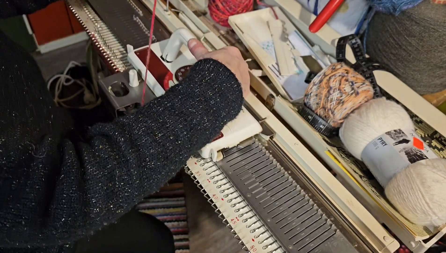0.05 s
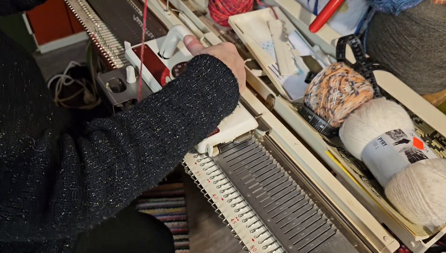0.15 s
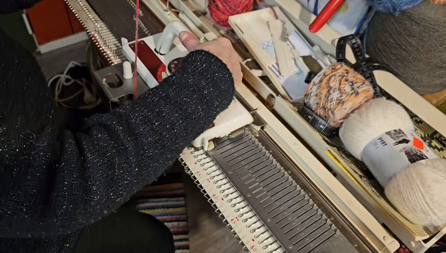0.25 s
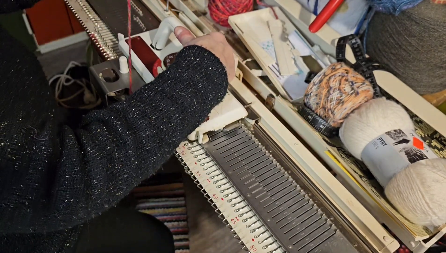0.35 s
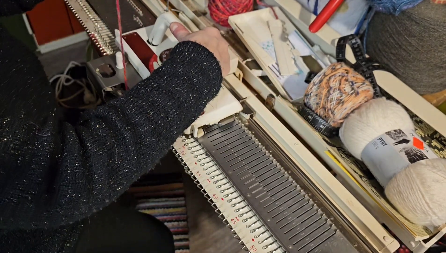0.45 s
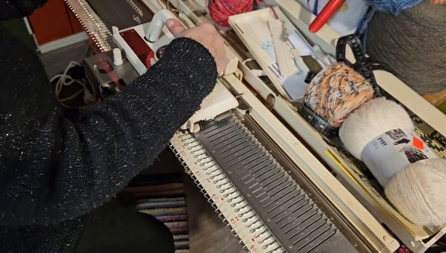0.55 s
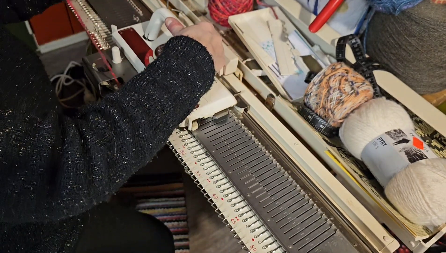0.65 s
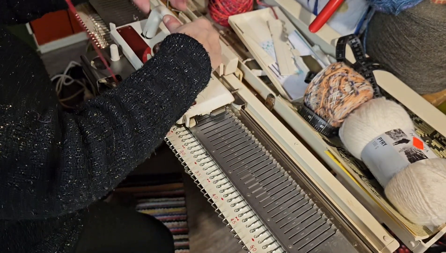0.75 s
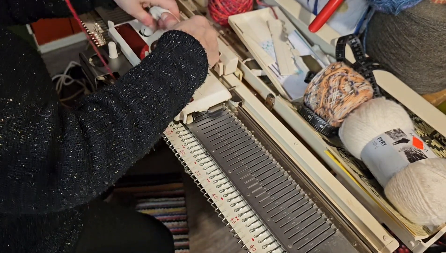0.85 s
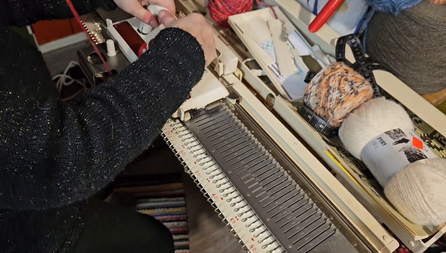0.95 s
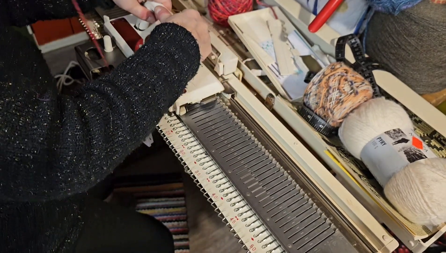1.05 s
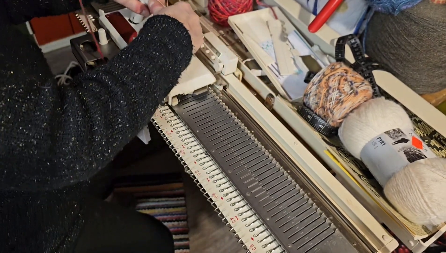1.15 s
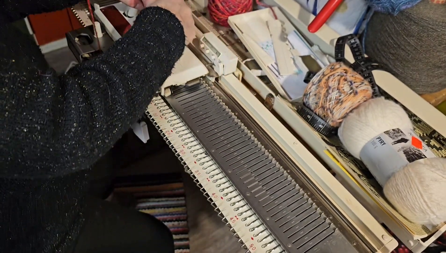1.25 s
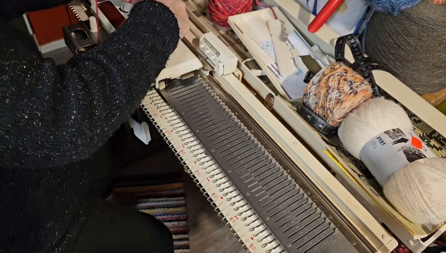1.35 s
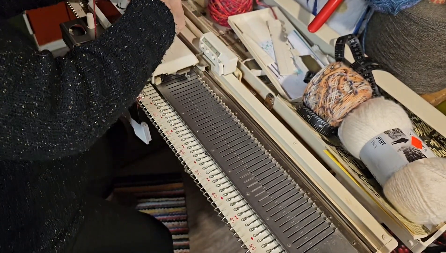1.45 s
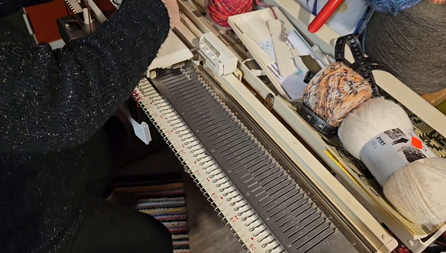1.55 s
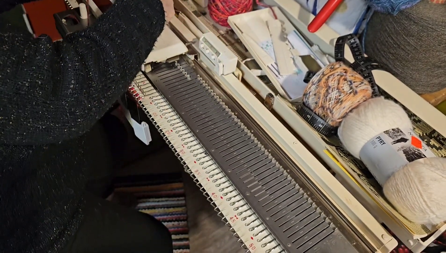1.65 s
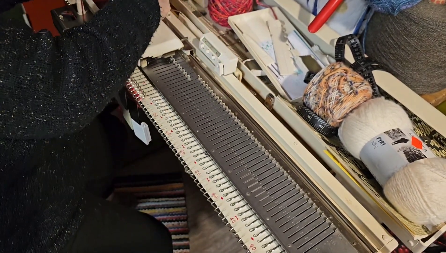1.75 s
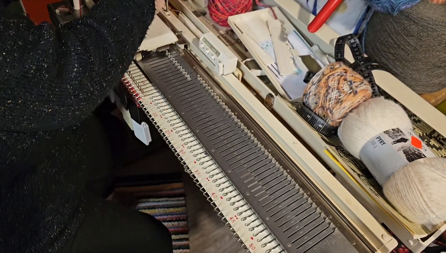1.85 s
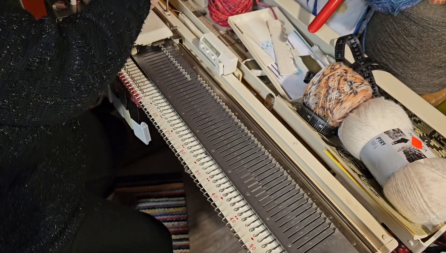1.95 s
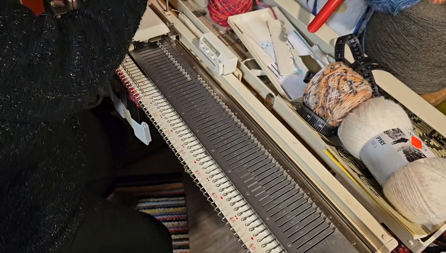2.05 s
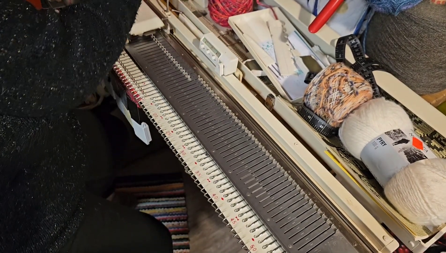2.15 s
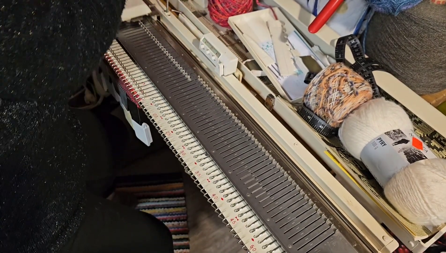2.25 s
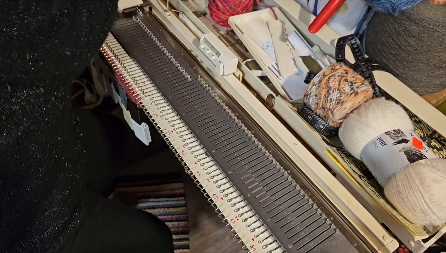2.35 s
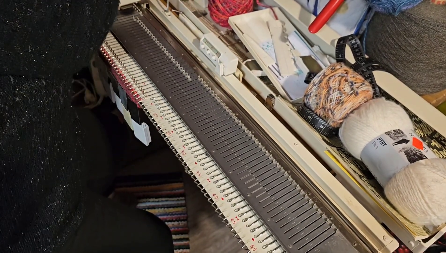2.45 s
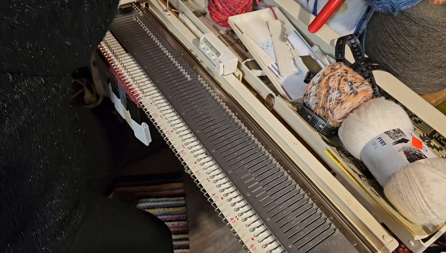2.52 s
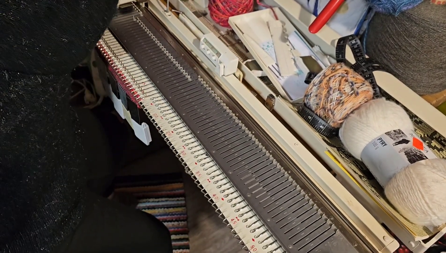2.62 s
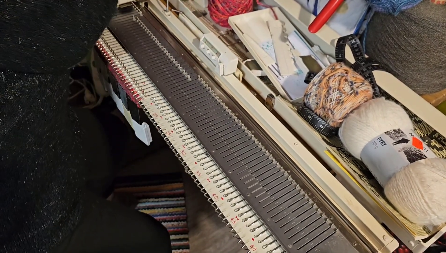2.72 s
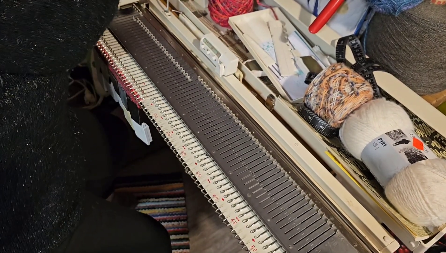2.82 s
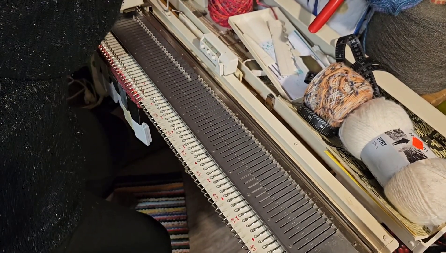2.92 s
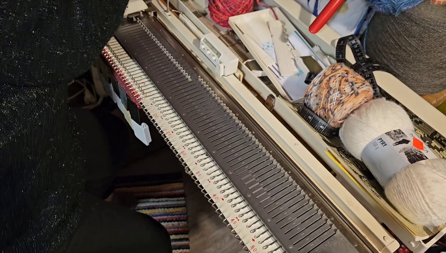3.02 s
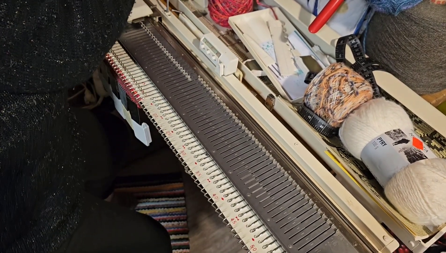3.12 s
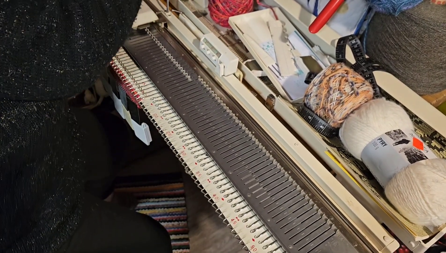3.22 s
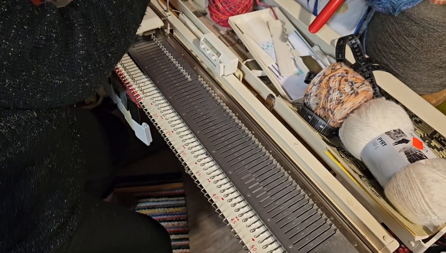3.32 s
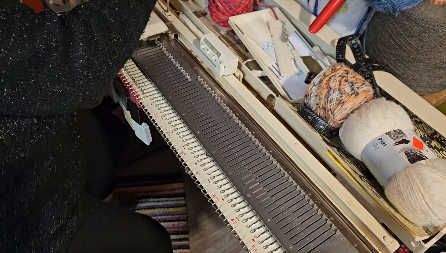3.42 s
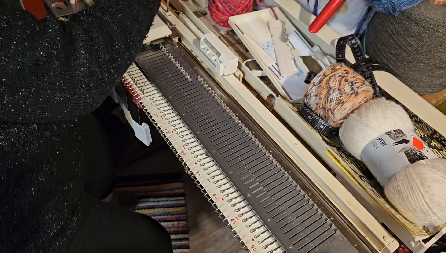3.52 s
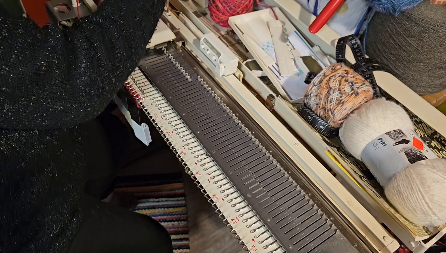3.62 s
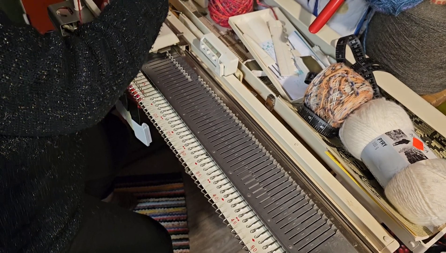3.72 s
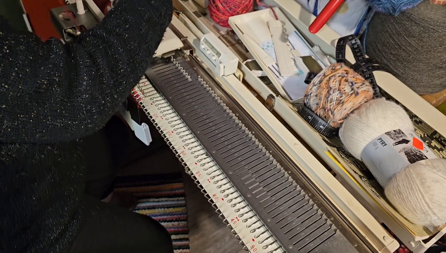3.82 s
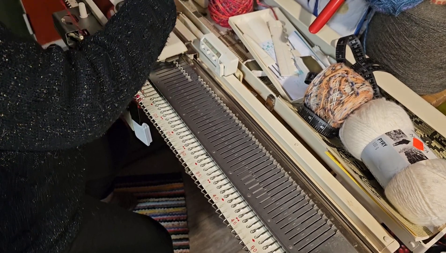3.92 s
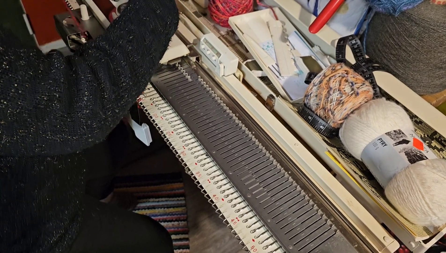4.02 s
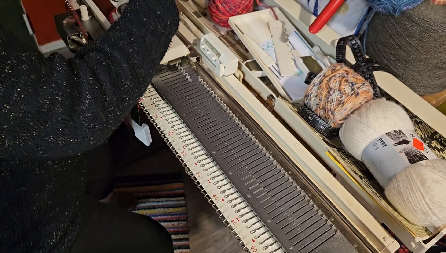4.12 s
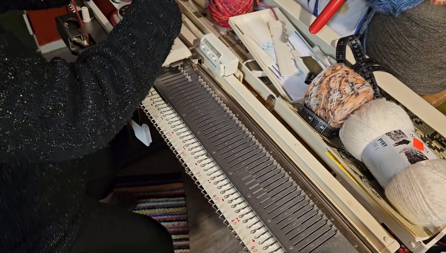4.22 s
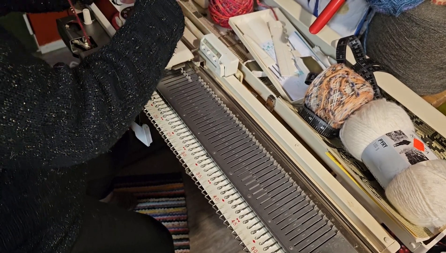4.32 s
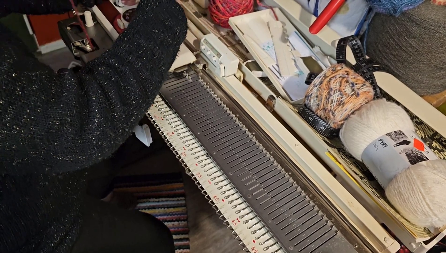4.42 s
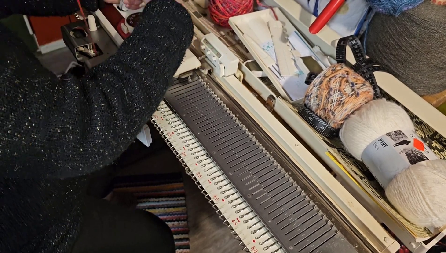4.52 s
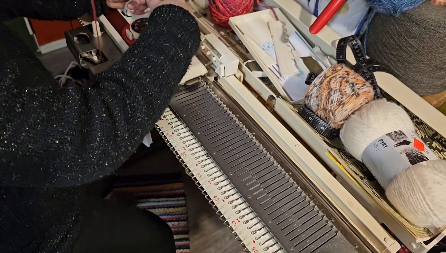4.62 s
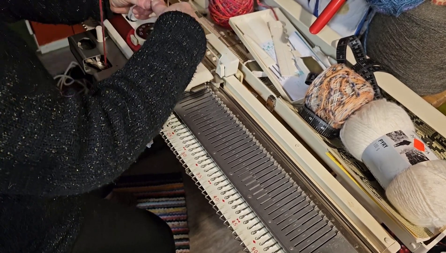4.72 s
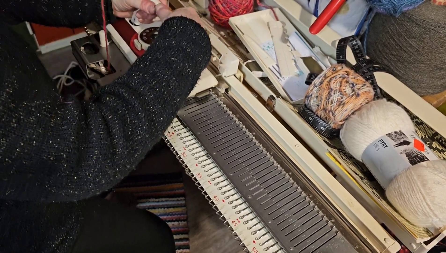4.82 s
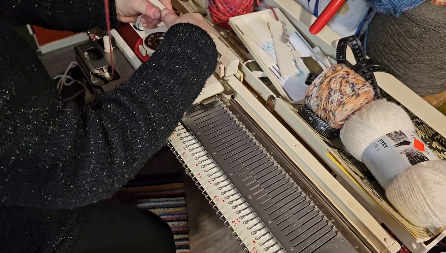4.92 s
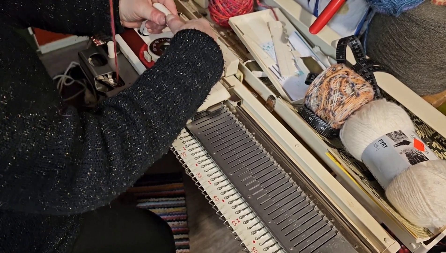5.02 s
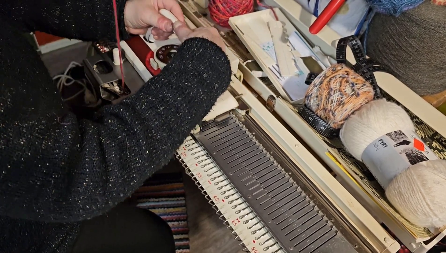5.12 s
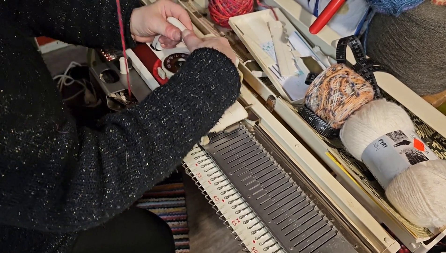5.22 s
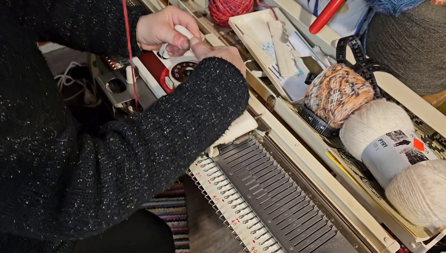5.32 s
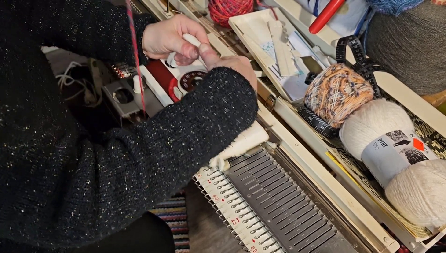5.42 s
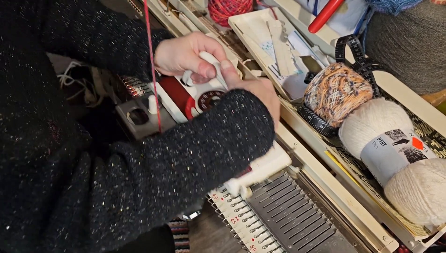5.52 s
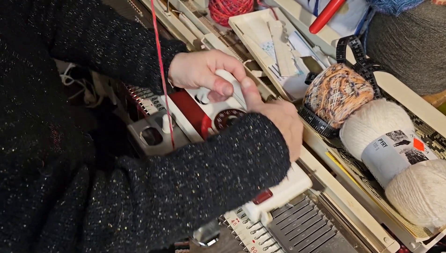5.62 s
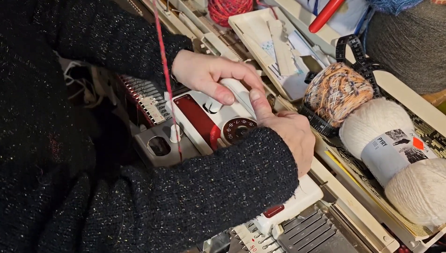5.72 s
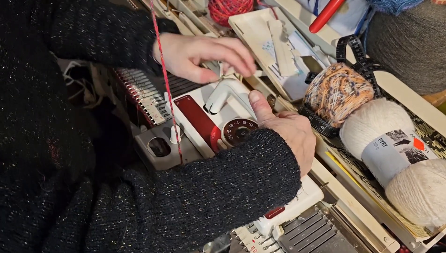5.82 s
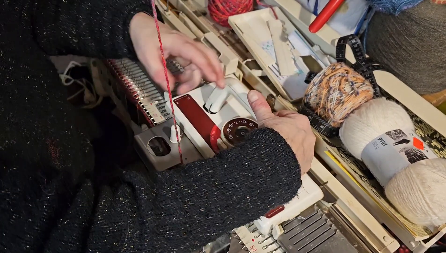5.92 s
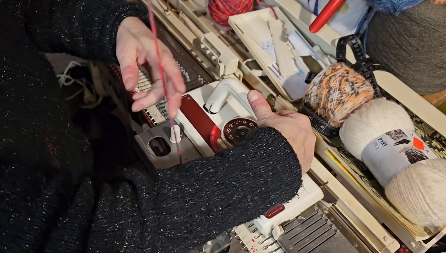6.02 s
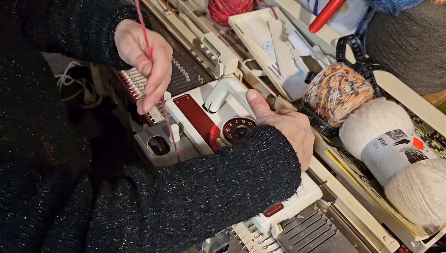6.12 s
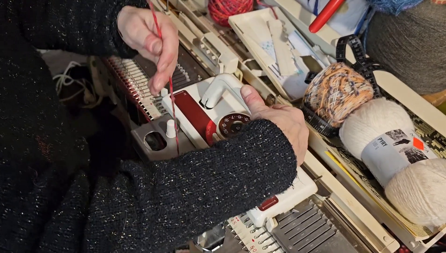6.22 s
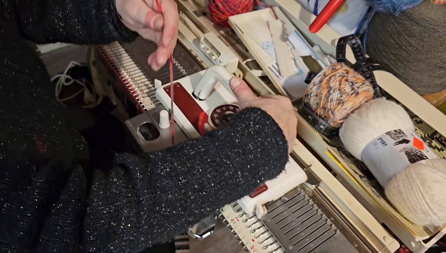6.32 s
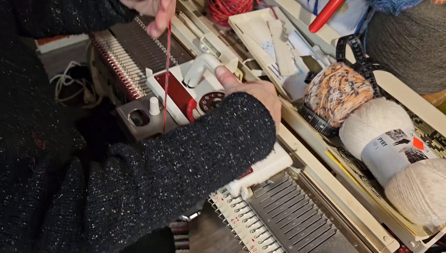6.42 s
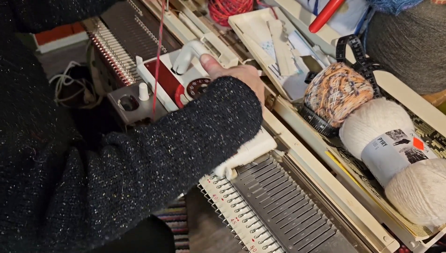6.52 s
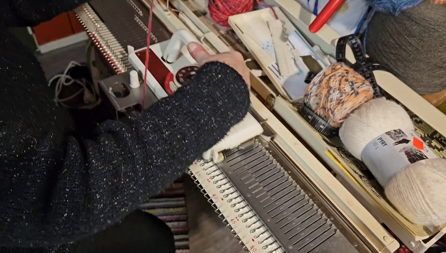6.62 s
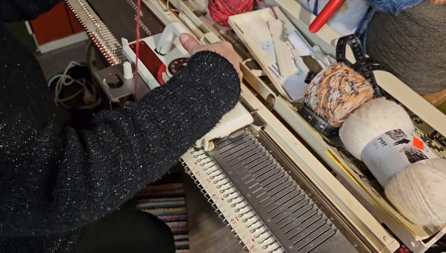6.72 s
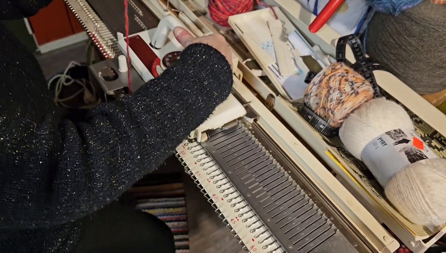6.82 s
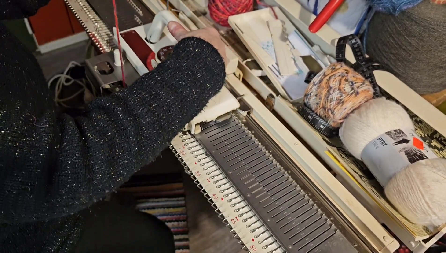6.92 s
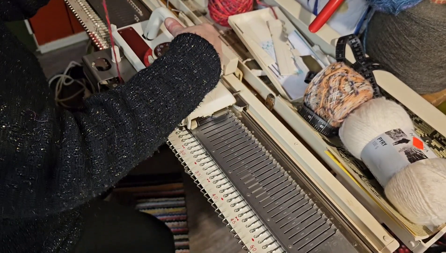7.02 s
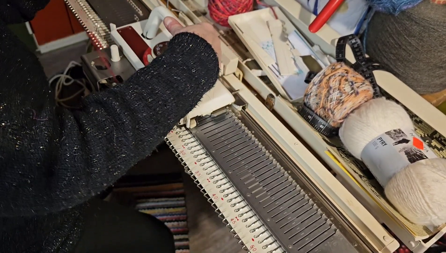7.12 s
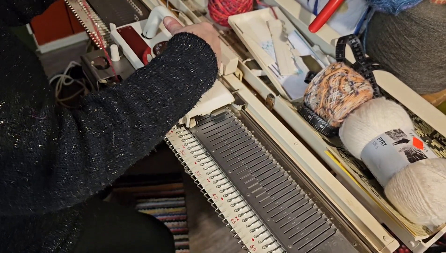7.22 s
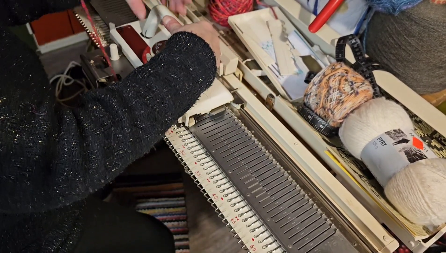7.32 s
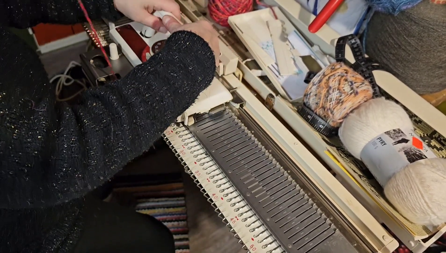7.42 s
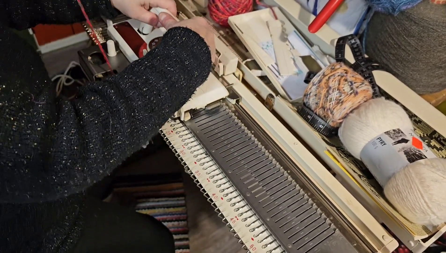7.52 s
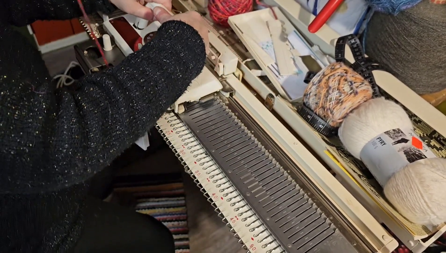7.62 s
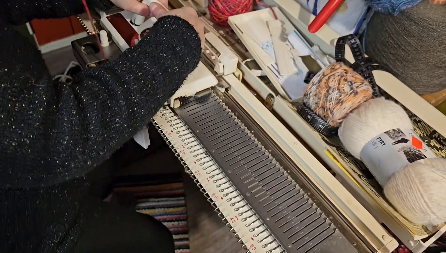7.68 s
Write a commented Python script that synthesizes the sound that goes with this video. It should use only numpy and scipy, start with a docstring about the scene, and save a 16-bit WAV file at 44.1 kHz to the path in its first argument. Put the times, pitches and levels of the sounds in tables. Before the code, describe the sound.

A knitting machine carriage is pushed back and forth along its metal needle bed, rasping and clicking, with heavy jolts and a brief squeal at the turn.

```python
"""A knitting machine in a quiet room: a hand pushes its carriage to and fro along the steel needle bed.
From the start the carriage rasps on its rails and shakes the table, and its cams kick needles into clicks.
It jolts at once, then far more heavily on the way out; it sets off back with a dry rub and latch knocks.
The return pass brings another heavy jolt; near its end, the rail squeals and squeaks as the carriage slows.
A thin ringing scrape and a second squeal start the last pass. Two microphones hear it, alike in the bass."""
import sys
import numpy as np
from scipy import signal
from scipy.fft import rfft, irfft, next_fast_len
from scipy.io import wavfile

SR = 44100
rng = np.random.default_rng(int(sys.argv[2]) if len(sys.argv) > 2 else 0)


def store_wav(level_fs):
    """Save 16-bit WAV to argv[1]."""
    pcm = np.round(np.clip(np.atleast_2d(level_fs), -1, 1) * 32767)
    wavfile.write(sys.argv[1], SR, pcm.T.astype(np.int16))


N = 341775
TIME = np.arange(N) / SR
SIZE = next_fast_len(N + SR // 2)
HZ = np.maximum(np.arange(SIZE // 2 + 1) * SR / SIZE, 1)


def from_db(db):
    """Decibels to amplitude gain."""
    return 10 ** (np.asarray(db) / 20)


def rms_one(x):
    """Scale to unit power."""
    return x / np.sqrt(np.mean(x ** 2) + 1e-20)


def in_time(rows):
    """Each column of a curve, joined by straight lines, at every sample."""
    s, *columns = np.transpose(rows)
    return [np.interp(TIME, s, column) for column in columns]


def at_hz(points):
    """A table joined by lines on a log-frequency axis."""
    hz, value = np.transpose(points)
    return np.interp(np.log(HZ), np.log(hz), value)


def drift(rate_hz):
    """Smooth chance with spread 1, mostly slower than the given rate."""
    white = rfft(rng.standard_normal(SIZE))
    return rms_one(irfft(white / (1 + (HZ / rate_hz) ** 2), SIZE)[:N])


# likeness of the left and right microphones, 1 for identical: pitch_hz, likeness
MICROPHONE_LIKENESS = [(180, 0.99), (350, 0.93), (630, 0.78), (1200, 0.44), (2200, 0.3), (4000, 0),
                       (11000, -.05)]


def noise(gain):
    """Stereo noise of a given colour, alike in both ears in the bass; unit power in the middle."""
    alike = np.clip(at_hz(MICROPHONE_LIKENESS), -.99, .99)
    white = rng.standard_normal((2, 2 * len(HZ)), dtype=np.float32).view(np.complex64)
    mid_side_gain = (gain * np.sqrt([1 + alike, 1 - alike])).astype(np.float32)
    mid, side = irfft(white * mid_side_gain, SIZE)[:, :N]
    return np.array([mid + side, mid - side]) / np.std(mid)


def resonance(hz, width_hz):
    """Response of one damped mode, 1 on top."""
    return 1 / (1 + 1j * (HZ ** 2 - hz ** 2) / (HZ * width_hz))


def die_away(power, t60_s):
    """Power that decays by 60 dB in t60 after each impulse."""
    return signal.lfilter([1], [1, -10 ** (-6 / (t60_s * SR))], power + 1e-18)


def blows(times_s, level_db, decays, rise_s):
    """Envelope of impacts; each (dB, t60 s) stage dies at its own pace: contact, metalwork, room."""
    impulses = np.zeros(N)
    impulses[np.clip(np.round(times_s * SR).astype(int), 0, N - 1)] = from_db(level_db) ** 2
    power = sum(from_db(db) ** 2 * die_away(impulses, t60_s) for db, t60_s in decays)
    keep = np.exp(-1 / (rise_s * SR))
    return np.sqrt(signal.lfilter([1 - keep], [1, -keep], power))


def grains(per_s, spread_db, t60_s, smooth_db):
    """Envelope of many tiny catches on top of even friction; unit power."""
    sizes = from_db(spread_db * np.minimum(rng.exponential(1, N), 3))
    catches = rng.random(N) < per_s / SR
    power = die_away(catches * sizes ** 2, t60_s)
    return rms_one(np.sqrt(power / power.mean() + from_db(smooth_db) ** 2))


def rings(times_s, level_db, low_hz, high_hz, t60_s, count):
    """Each contact falls on a different spot, so it rings at a few pitches of its own."""
    out = np.zeros((2, N + SR // 10))
    t = np.arange(SR // 10) / SR
    fade = from_db(-60 * t / t60_s) * (1 - np.exp(-t / 0.00047))
    for s, db in zip(times_s, level_db):
        hz = low_hz * (high_hz / low_hz) ** rng.random((count, 1))
        # high modes reach the two ears out of step
        turns = hz * t + rng.random((2, count, 1)) * np.minimum(hz / 4000, 1)
        modes = rng.random((count, 1)) * np.sin((2 * np.pi * turns).astype(np.float32))
        start = int(s * SR)
        out[:, start:start + len(t)] += from_db(db) * fade * modes.sum(axis=1)
    return out[:, :N]


def struck(rows, modes, rise_s):
    """Blows (s, dB) on a body that rings with its own modes (Hz, dB, t60 s)."""
    out = np.zeros(N + SR // 2)
    t = np.arange(SR // 2) / SR
    for s, db in rows:
        ring = 0
        for hz, mode_db, t60_s in modes:
            ring = ring + from_db(mode_db - 60 * t / t60_s) * np.sin(2 * np.pi * (hz * t + rng.random()))
        start = int(s * SR)
        out[start:start + len(t)] += from_db(db) * (1 - np.exp(-t / rise_s)) * ring
    return out[:N]


GRIP_S = 0.03  # a push takes hold this quickly


def strokes(rows, fade_db_per_s):
    """Level in dB of strokes that take hold, swell or ease while they last, and then fade."""
    level = 1e-6
    for start, end, first_db, last_db in rows:
        grip = np.clip((TIME - start) / GRIP_S, 0, 1)
        held_db = np.interp(TIME, [start, end], [first_db, last_db])
        fading_db = fade_db_per_s * np.maximum(TIME - end, 0)
        level = np.maximum(level, grip * from_db(held_db - fading_db))
    return 20 * np.log10(level)


# still air of the room, its colour: pitch_hz, density_db (per Hz)
AIR_COLOUR = [(35, -28.5), (60, 0.5), (153, -3.5), (322, -14.5), (418, -5.5), (978, -13.5), (1880, -8),
              (5240, -12), (12000, -28)]
AIR_DB = -72


def room_air():
    """The still air of the room is a faint, steady noise."""
    return from_db(AIR_DB) * noise(from_db(at_hz(AIR_COLOUR)))


# the hand pushes the carriage: start_s, end_s, friction_start_db, friction_end_db,
# shell_weight_db (added to the friction), table_shaking_db
HAND_PUSHES = [(-0.05, 0.055, -32, -40.5, -13, -61), (0.041, 0.302, -35.5, -47, 2.5, -45),
               (0.327, 0.743, -40, -43, 0, -47.5), (0.805, 0.98, -47.5, -42, 1.5, -51.5),
               (1.033, 1.165, -49, -39, 5, -50.5), (1.138, 1.45, -34, -30, -2, -46),
               (1.45, 2.106, -40, -36.5, 1.5, -46), (2.148, 2.33, -40.5, -37, -4, -50.5),
               (2.384, 2.51, -50.5, -49, -2.5, -47.5), (2.507, 2.664, -54, -59.5, -3.5, -60),
               (2.652, 2.895, -61.5, -77.5, 6, -70.5), (3.005, 3.367, -66.5, -55.5, -13, -72),
               (3.371, 4.126, -49.5, -45, 0, -64), (4.286, 4.586, -50.5, -46.5, 5, -51),
               (4.578, 5.48, -35.5, -34.5, 2, -45), (5.479, 5.79, -34.5, -47.5, 0.5, -46.5),
               (6.336, 6.557, -64.5, -50.5, -3.5, -65.5), (6.54, 6.663, -62, -41.5, -8, -50.5),
               (6.665, 6.88, -33.5, -35.5, -2.5, -48.5), (6.89, 7.17, -38.5, -43, 2.5, -56),
               (7.348, 7.464, -71, -52.5, 3.5, -59.5), (7.574, 7.767, -41.5, -33.5, -2, -50.5)]
COAST_DB_PER_S, SETTLE_DB_PER_S = 160, 106  # after a push: friction dies away, the table more slowly


def pushing():
    """Levels in dB of the friction on the rails and of the hand's weight on the shell."""
    friction_db = strokes([push[:4] for push in HAND_PUSHES], COAST_DB_PER_S)
    weighted = [(start, end, first + weight, last + weight)
                for start, end, first, last, weight, _ in HAND_PUSHES]
    return friction_db, strokes(weighted, COAST_DB_PER_S)


# colour of the carriage's rasp on the rails: pitch_hz, density_db (per Hz)
RASP_COLOUR = [(25, -7.5), (100, -13), (210, -7), (300, -2.5), (400, 6.5), (700, -2.5), (930, -4.5),
               (1300, 3), (2000, 3.5), (2700, -18.5), (5000, -28.5)]
# colour of the finer hiss of rails and latches: pitch_hz, density_db (per Hz)
HISS_COLOUR = [(1200, -17), (2500, -3), (4500, -2), (5700, -3), (10000, -8.5), (12000, -27.5)]


def sliding(friction_db, pressing_db):
    """The carriage scrapes its rails and latches flick; the hand's weight brings out rasp and shell hum."""
    latches = grains(per_s=130, spread_db=3.6, t60_s=0.013, smooth_db=0.5)
    latches = latches ** np.interp(friction_db, [-60, -50], [.3, 1])  # a light touch hardly flicks them
    scrape = grains(per_s=90, spread_db=3.0, t60_s=0.1, smooth_db=-4.0)
    rasp_db = (friction_db + pressing_db) / 2 - 5.5
    rasp = from_db(rasp_db) * scrape * noise(from_db(at_hz(RASP_COLOUR)))
    hiss_db = friction_db - 6.0 + 0.026 * (friction_db + 50)
    hiss = from_db(hiss_db) * latches * noise(from_db(at_hz(HISS_COLOUR)))
    shell_db = pressing_db - 15.5 + 2.0 * drift(11)
    shell = from_db(shell_db) * noise(np.abs(resonance(760, 390)) ** 2)
    return rasp + hiss + shell


# the shell's drone shifts with its load and place: time_s, pitch_hz
SHELL_DRONE = [(1.45, 669.6), (2.0, 677.3), (3.95, 681.3), (4.5, 704), (5.5, 695), (7.0, 681)]


def drone(pressing_db, wander_hz=22, upper_ratio=1.11, upper_db=-5):
    """Two neighbouring resonances of the shell wander in pitch and speak only under a firm push."""
    hz, = in_time(SHELL_DRONE)
    turn = 2 * np.pi * np.cumsum(hz) / SR
    lower = drift(wander_hz) * np.cos(turn) + drift(wander_hz) * np.sin(turn)
    upper_turn = upper_ratio * turn
    upper = drift(wander_hz) * np.cos(upper_turn) + drift(wander_hz) * np.sin(upper_turn)
    level_db = pressing_db - 12.5 + 0.26 * (pressing_db + 34.0)
    return from_db(level_db) * (lower + from_db(upper_db) * upper)


# resonances of bed and carriage: pitch_hz, width_hz, boost_db
BED_RESONANCES = [(429.4, 15, 6), (676, 50, 9), (853.5, 21, 8.5), (1065, 85, 5.5), (2350, 12, 4.5),
                  (3650, 71, 3.5), (6310, 69, 5), (7365, 38, 7)]


def bed(x):
    """What touches the bed rings with its modes."""
    response = 1
    for hz, width_hz, boost_db in BED_RESONANCES:
        response = response * (1 + (from_db(boost_db) - 1) * resonance(hz, width_hz))
    return from_db(-1.5) * irfft(rfft(x, SIZE) * response, SIZE)[:, :N]


def shaking(s, knock_db):
    """Level in dB of the table's shaking: each push keeps it going and each knock jolts it."""
    held = [(start, end, db, db) for start, end, *_, db in HAND_PUSHES]
    pushed = from_db(strokes(held, SETTLE_DB_PER_S))
    jolted = blows(s, knock_db, [(-11.5, 0.51)], rise_s=0.011)
    return 20 * np.log10(np.hypot(pushed, jolted))


# resonances of the table: pitch_hz, width_hz, level_db
TABLE_RESONANCES = [(111.4, 13, -3), (137.9, 3.7, 7), (189, 25, -6.5)]
# the table top thumps: time_s, level_db
TOP_THUMPS = [(0.11, -33), (0.355, -33), (1.44, -30), (2.025, -32), (2.127, -30), (5.31, -28.5),
              (5.52, -27), (7.7, -33)]
# the frame under it thuds, mostly towards the far end of the bed: time_s, level_db
FRAME_THUDS = [(1.345, -49.5), (1.457, -47.5), (1.957, -40), (2.04, -41), (2.25, -39), (7.1, -51)]


def table(rumble_db, friction_db):
    """The carriage shakes the table in lumps at its low modes; now and then the top thumps or frame thuds."""
    mode_power = sum(np.abs(from_db(db) * resonance(hz, width)) ** 2 for hz, width, db in TABLE_RESONANCES)
    lumps = grains(per_s=90, spread_db=1.5, t60_s=0.2, smooth_db=-6)
    rumble_colour = np.sqrt(mode_power) / (1 + (HZ / 280) ** 4) / (1 + (70 / HZ) ** 2)
    rumble = from_db(rumble_db - 2.0) * noise(rumble_colour)
    frame_db = rumble_db - 20.0 + 0.41 * (friction_db + 42.5) + 2.0 * drift(7.5)
    frame = from_db(frame_db) * noise(np.abs(resonance(61, 38)) / (1 + (HZ / 150) ** 4))
    thumps = struck(TOP_THUMPS, [(133.9, 0.0071, 0.23)], rise_s=0.012)
    thuds = struck(FRAME_THUDS, [(60.0, 0.0038, 0.52)], rise_s=0.0054)
    return lumps * (rumble + frame) + thumps + thuds


# the cams kick needles into clicks, at slow and fast travel alike: time_s, tick_db, brightness_db
TIMED_KICKS = [(0.0562, -30, 7), (0.1694, -41, 16.5), (0.3295, -41, 3), (0.4448, -41.5, 13),
               (0.4883, -35, 4), (0.5503, -30.5, 2.0), (0.6154, -25.5, 2), (0.7021, -27.5, 2.5),
               (0.843, -29, 1.5), (0.9623, -35, -1.5), (1.0806, -28.5, 1.5), (1.1608, -28.5, -1.5),
               (1.3521, -26, 2), (1.4701, -31, -3), (1.5437, -31.0, 0.0), (1.6013, -28.5, 1),
               (1.6567, -27.0, 0.5), (1.6975, -25.5, -1), (1.7371, -28.0, 0), (1.7906, -29.5, -0.0),
               (2.0283, -22.5, 3.5), (2.0712, -29, 1.5), (2.1235, -30.5, 1), (2.1986, -28.5, -1.0),
               (2.2493, -32.5, 1), (2.36, -22.5, 5), (2.3828, -24, 7), (2.4693, -42.5, 1),
               (2.853, -66.5, -6), (3.0667, -61.5, -7), (3.2349, -27, 5), (3.388, -39, 11),
               (3.3955, -34.5, 3), (3.5987, -44.5, 0), (4.1583, -41.5, -3.5), (4.2797, -56, -6),
               (4.3666, -32.5, -0.5), (4.4871, -31, -1.5), (4.5935, -26.5, 1), (4.6414, -23.0, 2.5),
               (4.8659, -30, -1.0), (4.933, -28, 0), (4.9797, -30, -2), (5.2504, -23, -2.5),
               (5.4534, -27.5, -7), (5.4856, -28.5, -5.5), (5.525, -44, 1), (5.6299, -22.5, -4),
               (5.6624, -34, 9), (5.86, -52.5, -3), (5.9519, -60.5, 4), (6.03, -56, -2),
               (6.3091, -60.5, -3.5), (6.5703, -36, -1), (6.9369, -33.5, 1), (6.9837, -29, 1.5),
               (7.0297, -25, -1.5), (7.0895, -28.5, 3.0), (7.1698, -31, 2.5), (7.4166, -49, -4),
               (7.588, -37.5, -4.5), (7.6488, -28.5, -4), (7.704, -28.5, -1.5)]
# runs of needles kicked at an even pace: first_s, last_s, needles (count), tick_db
EVEN_RUNS = [(1.209, 1.316, 4, -26), (1.855, 1.985, 4, -27.5), (3.410, 3.486, 5, -43),
             (3.514, 3.539, 2, -45), (3.66, 3.74, 5, -46), (3.821, 4.057, 5, -37.5), (4.686, 4.813, 4, -29),
             (5.1285, 5.207, 3, -27.5), (5.284, 5.4173, 5, -28), (6.678, 6.763, 4, -39.5)]
UNEVEN_DB, COLOUR_SPREAD_DB = 1.3, 2  # spread from needle to needle in a run: strength, brightness
FIRM_TICK_DB, FIRM_KNOCK_DB = -27, -38  # a firm kick, and its knock in the bed
KNOCK_FOLLOWS = 0.77  # the knock follows this share of the tick's swing in dB


def kicks():
    """Time, tick, brightness and knock of every needle kicked, individually timed or in even runs."""
    rows = list(TIMED_KICKS)
    for first, last, needles, db in EVEN_RUNS:
        for s in np.linspace(first, last, round(needles)):
            tick_db = db + UNEVEN_DB * rng.standard_normal()
            rows.append((s, tick_db, COLOUR_SPREAD_DB * rng.standard_normal()))
    s, tick_db, bright_db = np.transpose(rows)
    knock_db = FIRM_KNOCK_DB + KNOCK_FOLLOWS * (tick_db - FIRM_TICK_DB)
    return s, tick_db, bright_db, knock_db


# colour of steel snapping on steel: pitch_hz, density_db (per Hz)
SNAP_COLOUR = [(1000, -18), (2400, -2), (4500, 8), (6200, 1), (10000, 1.5), (12000, -15)]
# colour of the knock through the bed: pitch_hz, density_db (per Hz)
KNOCK_COLOUR = [(300, -28.5), (600, -15.5), (900, -8.5), (1400, -1.5), (2100, 2), (3000, -11.5),
                (6000, -27)]
SNAP_RISE_S = 0.0005  # the contact builds up this quickly


def needle_kicks(s, tick_db, bright_db, knock_db):
    """Steel snaps on steel with a weaker tail; a slower knock runs through bed and shell, and parts ring."""
    upper = 1 / (1 + (6000 / HZ) ** 8)
    snap_then_tail = [(2.5, 0.015), (-5.0, 0.09), (-8.0, 0.21)]
    snap = 0
    # a brighter kick has more of the upper band and less of the lower
    for tilt_db, share in ((bright_db / 2 - 2.5, upper), (0.8 - bright_db / 2, 1 - upper)):
        envelope = blows(s, tick_db + tilt_db, snap_then_tail, SNAP_RISE_S)
        snap = snap + envelope * noise(from_db(at_hz(SNAP_COLOUR)) * np.sqrt(share)) / np.sqrt(2)
    knock = blows(s, knock_db - bright_db / 2, [(-4.0, 0.13), (-2.5, 0.17)], rise_s=0.0011)
    knock = knock * noise(from_db(at_hz(KNOCK_COLOUR)))
    shell = blows(s, tick_db - bright_db / 2, [(-18.5, 0.22)], rise_s=0.0011)
    shell = shell * noise(np.abs(resonance(620, 420)) ** 2)
    needles = rings(s, tick_db + 1, low_hz=3000, high_hz=8500, t60_s=0.025, count=4)
    plates = rings(s, knock_db - 1.0, low_hz=952.0, high_hz=2575, t60_s=0.17, count=4)
    return snap + knock + shell + needles + plates


# the carriage jolting over a catch: time_s, tick_db, knock_db
CATCH_JOLTS = [(0.057, -45, -37), (1.398, -19, -26.5), (5.0335, -20.5, -24)]
# what the jolt rings in the carriage body: pitch_hz, level_db, t60_s
CARRIAGE_MODES = [(600, 0, 0.074), (690, -1, 0.1), (826, 3.5, 0.11), (1216, 1.5, 0.065), (1514, 1.5, 0.045),
                  (2910, -3.5, 0.064)]
REBOUND_S, REBOUND_DB = 0.006, -2  # the jolt strikes twice in quick succession


def clunks():
    """A heavy jolt and its rebound knock the whole carriage body, with a thin steel chink on top."""
    s, tick_db, knock_db = np.transpose(CATCH_JOLTS)
    chink = blows(s, tick_db, [(3.5, .022), (-2.5, 0.2)], rise_s=0.0011)
    twice_s = np.r_[s, s + REBOUND_S]
    twice_db = np.r_[knock_db, knock_db + REBOUND_DB]
    knock = blows(twice_s, twice_db, [(2.5, 0.065), (-2.0, 0.2)], rise_s=0.00085)
    # colours: pitch_hz, density_db (per Hz)
    bright = [(1200, -15.0), (3500, -9.5), (6800, -11.0), (8300, -6.5), (10000, -8.5), (12000, -22)]
    heavy = [(300, -17.5), (550, -3.5), (1050, -6.0), (1400, 4.5), (2600, -1), (3600, -12.0), (5000, -21)]
    body = struck(zip(s, knock_db), CARRIAGE_MODES, rise_s=.0008)
    return body + bed(chink * noise(from_db(at_hz(bright))) + knock * noise(from_db(at_hz(heavy))))


# the hollow shell of the carriage rocks and bumps: time_s, level_db
SHELL_BUMPS = [(0.366, -43.5), (0.647, -42), (2.775, -65), (2.885, -68), (3.045, -69), (4.917, -41.5),
               (5.301, -42.5)]


def bumps():
    """The hollow shell of the carriage booms softly when it rocks."""
    s, level_db = np.transpose(SHELL_BUMPS)
    envelope = blows(s, level_db, [(4.0, 0.16), (-14.0, 0.21)], rise_s=0.0022)
    return envelope * noise(np.abs(resonance(570, 420)) / (1 + (HZ / 3000) ** 2))


def rub(rows, modes, edge_hz=2600):
    """A gritty rub in a few narrow bands that wander in pitch, with almost nothing above the edge."""
    power = sum(np.abs(from_db(db) * resonance(hz, width_hz)) ** 2 for hz, width_hz, db in modes)
    grit = grains(per_s=90, spread_db=3, t60_s=0.045, smooth_db=-3)
    steady = noise(np.sqrt(power) / (1 + (HZ / edge_hz) ** 16))
    position = np.cumsum(1 + 0.045 * drift(9))  # uneven reading speed bends the pitch
    bands = np.array([np.interp(position, np.arange(N), ear) for ear in steady])
    return from_db(strokes(rows, COAST_DB_PER_S)) * grit * bands


# a dry rub as the carriage sets off from the far end: start_s, end_s, start_level_db, end_level_db
FAR_END_RUB = [(3.39, 4.13, -49, -56)]
# its resonances: pitch_hz, width_hz, level_db
FAR_END_MODES = [(670, 56, -1.5), (800, 51, 3), (1160, 84, -2), (1280, 68, 1), (1720, 100, -1)]


def far_rub():
    """Dry friction at the far end excites a few resonances."""
    return rub(FAR_END_RUB, FAR_END_MODES)


# the carriage shell meets a latch: time_s, level_db
LATCH_BLOWS = [(3.821, -33), (3.882, -36), (3.939, -36), (6.57, -32)]
# what the latch rings with: pitch_hz, level_db, t60_s
LATCH_RINGING = [(1916, 1.5, 0.035), (2170, -2, 0.048)]


def latch_knocks():
    """The shell meets a latch with a woody knock: two short-lived modes."""
    return struck(LATCH_BLOWS, LATCH_RINGING, rise_s=0.0019)


# thin, hoarse rail squeals on either side of the turn: start_s, end_s, pitch_hz, level_db
RAIL_SQUEALS = [(5.565, 5.623, 5540, -48.5), (6.615, 6.675, 5810, -56)]
SQUEAL_WIDTH_HZ = 420  # width of the resonance, whose response is squared


def squeals():
    """Dry steel on the rail chatters in one narrow, high band."""
    out = 0
    for start, end, hz, db in RAIL_SQUEALS:
        envelope = from_db(strokes([(start, end, db, db)], COAST_DB_PER_S))
        out = out + envelope * noise(np.abs(resonance(hz, SQUEAL_WIDTH_HZ)) ** 2)
    return out


# the carriage squeaking on its rail: time_s, pitch_hz, level_db
RAIL_SQUEAK = [(5.695, 2413, -52), (5.715, 2414, -36.5), (5.735, 2400, -55), (5.785, 2430, -45.5),
               (5.83, 2340, -86)]


def squeak(waver=0.0036):
    """Stick and slip on the rail makes a thin, unsteady tone that flutters in strength."""
    hz, level_db = in_time(RAIL_SQUEAK)
    sounding = (TIME > RAIL_SQUEAK[0][0]) & (TIME < RAIL_SQUEAK[-1][0])
    turn = 2 * np.pi * np.cumsum(hz * (1 + waver * drift(87))) / SR
    return sounding * from_db(level_db + 2 * drift(40)) * np.sin(turn)


# a scrape as the carriage sets off from the near end: start_s, end_s, start_level_db, end_level_db
NEAR_END_RUB = [(6.405, 6.66, -59.5, -54.5)]
# its resonances: pitch_hz, width_hz, level_db
NEAR_END_MODES = [(580, 45, 1.5), (1308, 40, 1.5), (1750, 300, -12.5), (2220, 110, -8.5), (2350, 70, 3)]


def near_rub():
    """Friction at the near end excites higher resonances: a thinner, ringing scrape."""
    return rub(NEAR_END_RUB, NEAR_END_MODES)


def scene():
    """Machine, table and the still air of the room."""
    friction_db, pressing_db = pushing()
    s, tick_db, bright_db, knock_db = kicks()
    on_bed = sliding(friction_db, pressing_db) + needle_kicks(s, tick_db, bright_db, knock_db) + bumps()
    machine = bed(on_bed) + drone(pressing_db) + clunks()
    rubs = far_rub() + latch_knocks() + squeals() + squeak() + near_rub()
    return room_air() + machine + table(shaking(s, knock_db), friction_db) + rubs


# balance of the two microphones: pitch_hz, left_minus_right_db
MICROPHONE_BALANCE = [(120, 0), (450, 2), (1100, 2), (4000, 0), (11000, 0.4)]
CUTOFF_HZ = 11600


def record(dry):
    """The left microphone hears a little more of the middle range; the top is cut."""
    half_each_way = np.array([[.5], [-.5]])
    balance = from_db(at_hz(MICROPHONE_BALANCE) * half_each_way)
    heard = irfft(rfft(dry, SIZE) * balance, SIZE)[:, :N]
    top_cut = signal.ellip(8, .3, 70, CUTOFF_HZ, fs=SR, output="sos")
    return signal.sosfilt(top_cut, heard)


dry = scene()
out = record(dry)
store_wav(out)
```